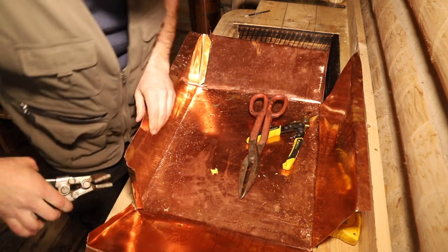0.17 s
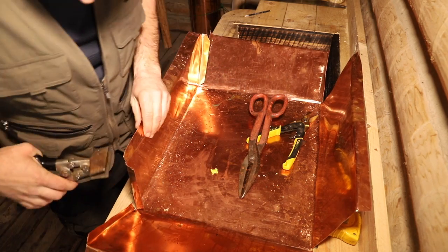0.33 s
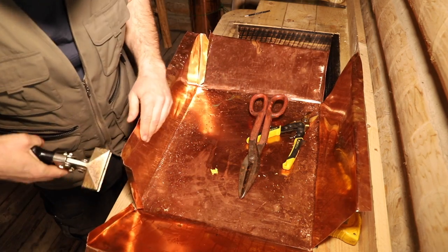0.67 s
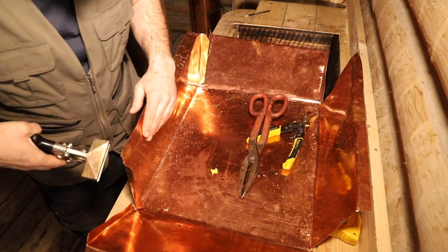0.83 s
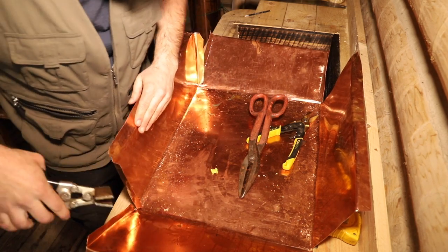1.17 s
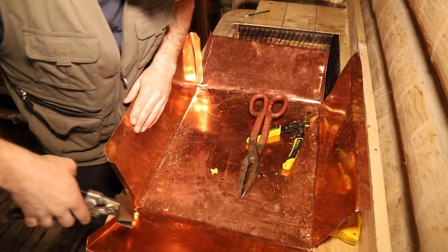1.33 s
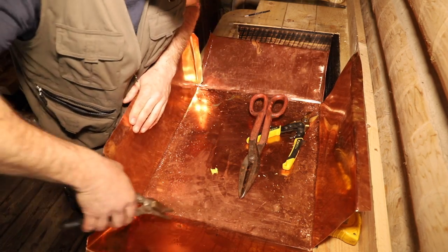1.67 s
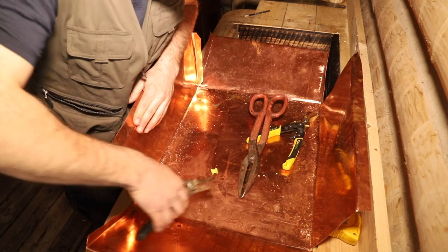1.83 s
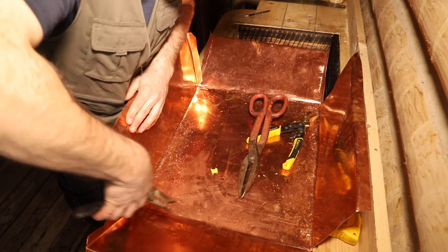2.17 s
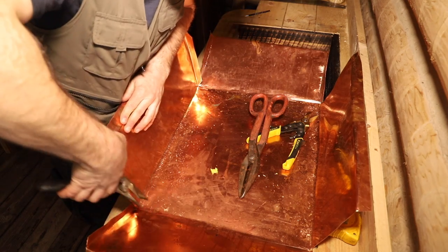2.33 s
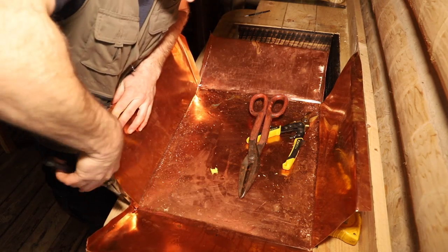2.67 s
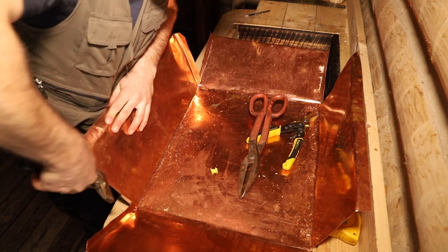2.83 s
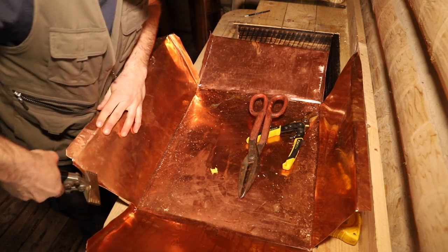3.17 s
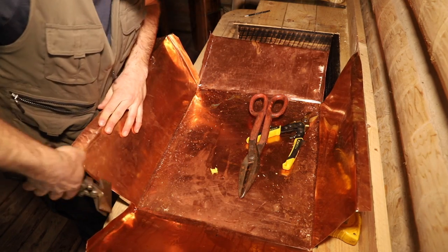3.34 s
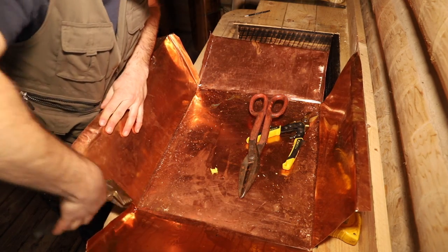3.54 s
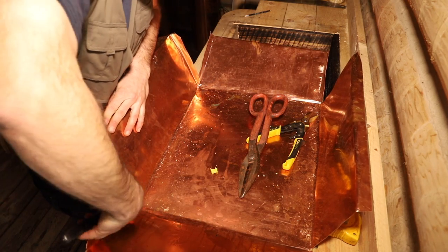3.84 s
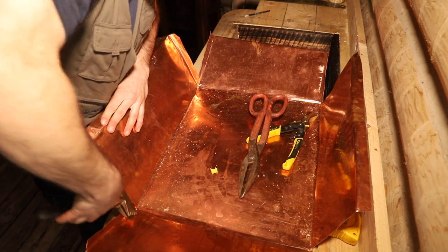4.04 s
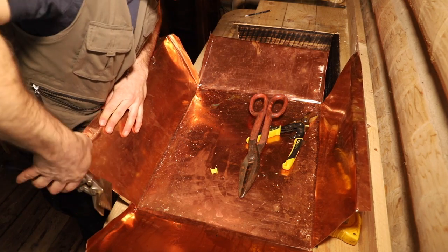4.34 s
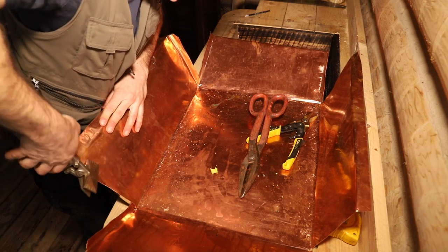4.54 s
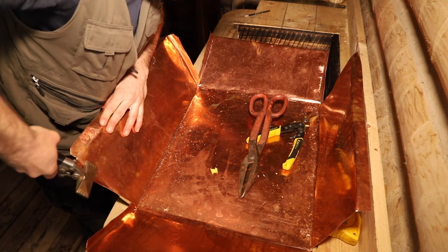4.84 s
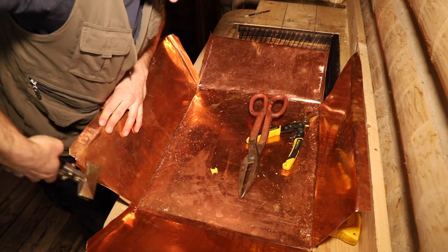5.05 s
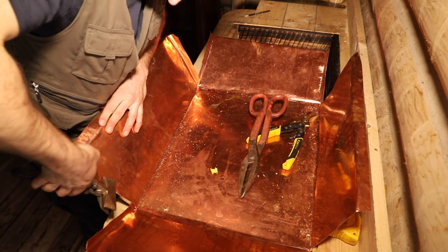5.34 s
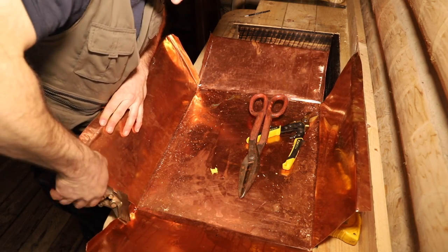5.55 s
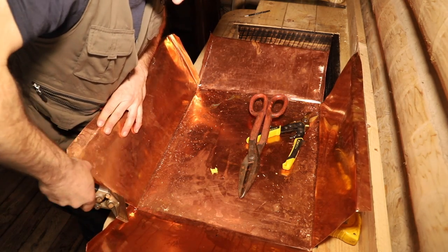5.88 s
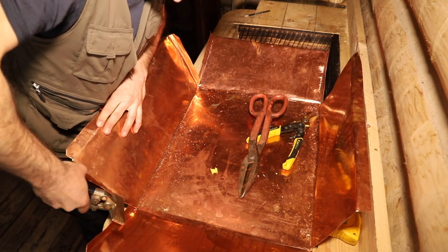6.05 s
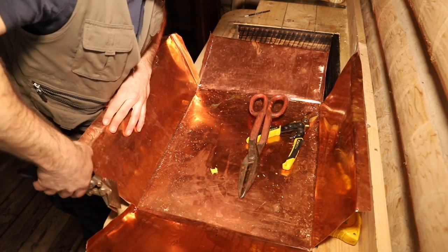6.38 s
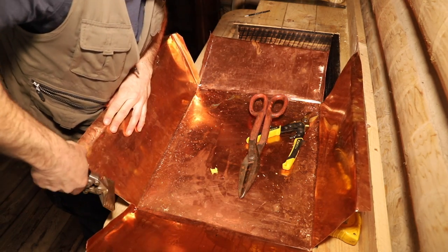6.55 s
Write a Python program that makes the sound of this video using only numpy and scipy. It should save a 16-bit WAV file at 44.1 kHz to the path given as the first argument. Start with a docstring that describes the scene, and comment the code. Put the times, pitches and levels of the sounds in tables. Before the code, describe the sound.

A close microphone in a quiet wooden workshop, with low rumble and slight hiss. From 0 to 2.4 s a thin copper sheet barely stirs: a faint scrape at the start, a soft counter thump at 0.55, a small cluster of knocks at 1.2, light creaks and tiny clinks. At 2.5 it scrapes and snaps, then at 2.8 to 2.95 knocks hard on the wood, the loudest moment, with a booming, wavering ring and a low groan near 3.1. From 3.35 scraping returns; between 3.6 and 4.7 come crowded buckling snaps, creaks, short gliding groans and bright steel clinks, strongest around 3.9, 4.3 and 4.6. It quiets by 4.8 with small clicks. A gritty scrape and snaps come at 5.1 to 5.25, a ringing snap at 5.65, then a lull. From 6.2 creaks, snaps and a clink at 6.44 continue to the end.

```python
"""Over a quiet room tone a thin copper sheet sways, creaks and scrapes as it is folded by hand with pliers.
Soon the steel pliers clink, and the sheet knocks on a wooden counter, snaps as it buckles and groans.
Sliding, sticking and blows are all clicks sent through the same modes (natural tones) of the sheet.
The pliers and the counter ring in tones of their own, and the groans are gliding tones.
A close microphone with a limiter turns the sound down after the loudest blows."""
import sys
import numpy as np
from scipy import signal
from scipy.fft import rfft, irfft
from scipy.io import wavfile
from scipy.ndimage import uniform_filter1d, minimum_filter1d, map_coordinates

SR = 44100
rng = np.random.default_rng(int(sys.argv[2]) if len(sys.argv) > 2 else 0)


def put_to_file(sound):
    """Save the sound as 16-bit audio at rate SR, in the file named by the first command-line argument."""
    columns = np.atleast_2d(sound).T  # one column per channel
    safe = np.clip(columns, -1, 1)
    whole_steps = np.round(safe * 32767)
    wavfile.write(sys.argv[1], SR, whole_steps.astype(np.int16))


N = 295911
T = np.arange(SR) / SR  # one second of ring
HZ = np.fft.rfftfreq(SR, 1 / SR)  # a grid of 1 Hz steps


def gain_of(db):
    """Turns decibels into amplitude."""
    return 10 ** (np.asarray(db) / 20)


def read(points, hz):
    """Joins (Hz, value) points by straight lines on a logarithmic frequency axis."""
    f, value = np.transpose(points)
    return np.interp(np.log(hz + 1), np.log(f + 1), value)


def add(mix, s, sound):
    """Adds a sound to the mix at s seconds."""
    part = mix[max(round(s * SR), 0):][:len(sound)]
    part += sound[:len(part)]


def dying(t60):
    """An exponential decay of unit energy that falls by 60 dB in t60 seconds."""
    fall = np.exp(-np.log(1000) * T / max(t60, 1 / SR))
    return fall / np.linalg.norm(fall)


def coloured_noise(colour):
    """Steady noise whose strength at each frequency follows a colour table."""
    spectrum = rfft(rng.standard_normal(N))
    return irfft(spectrum * gain_of(read(colour, np.fft.rfftfreq(N, 1 / SR))), N)


def plate_modes():
    """A plate has evenly dense modes: many weak ones and a few strong ones on the 1 Hz grid."""
    # The strongest modes of the folded sheet. Each row: frequency in Hz, level in dB over the weak ones.
    strong_modes = [(66, 14), (103, 4), (111, -16), (138, -5), (216, 8.5), (225, 4), (307, 9.5), (320, 9),
                    (393, 7), (479, 5), (527, 8.5), (570, 8.5), (689, 9.5), (791, 9.5), (915, 6),
                    (1060, 10.5), (1104, -0.5), (1345, 0.5), (1534, 10.5), (1663, 10.5), (1900, 3),
                    (2131, 8), (2406, 9.5), (2508, 4.5), (2713, 11.5), (2896, 8.5), (3192, 9), (3570, -14)]
    spacing = 14  # Hz
    heights = np.zeros(len(HZ))
    slots = np.arange(2 * spacing, len(HZ) - spacing, spacing)
    heights[slots + rng.integers(0, spacing, len(slots))] = 1
    for hz, db in strong_modes:
        heights[round(hz)] = gain_of(db)
    return heights / irfft(heights).std()


def nodes(depth_db):
    """Each spot on the sheet favours its own groups of modes: a ripple in dB that keeps the average power."""
    grid = np.arange(0, SR / 2, 130)
    ripple = depth_db * np.interp(HZ, grid, rng.uniform(-0.92, 1, len(grid)))
    return ripple - 10 * np.log10(np.mean(gain_of(ripple) ** 2))


def causal(colour_db):
    """Makes a colour into a minimum-phase filter, so that nothing sounds before the touch."""
    fold = 2. * (T < .5)
    fold[0] = 1
    cepstrum = irfft(np.log(gain_of(colour_db)))
    return np.exp(rfft(cepstrum * fold))


def response(modes, colour_db, crack_t60, ring_db, ring_time_factor=1, spread_s=0.001993):
    """The sheet's answer to a click at one spot: a dense crack, then the modes, the high ones mostly dying first."""
    # How long the sheet rings when free. Each row: frequency in Hz, time to fall by 60 dB in s.
    ring_times = [(60, 1.4), (250, 1.03), (700, 0.44), (1500, 0.5), (3000, 0.36), (6000, 0.22),
                  (12000, 0.12)]
    crack = rng.standard_normal(SR) * dying(crack_t60)
    spot = modes * np.exp(2j * np.pi * rng.random(len(HZ)))
    centres, t60s = np.transpose(ring_times)
    ring = np.zeros(SR)
    for peak, t60 in zip(np.eye(len(centres)), t60s):
        band = np.interp(np.log(HZ + 1), np.log(centres), peak)
        ring += irfft(spot * band) * dying(t60 * ring_time_factor)
    delay = spread_s / np.sqrt(1 + HZ / 1000)  # bending waves: the bass arrives late
    travel = np.exp(-2j * np.pi * np.cumsum(delay))
    answer = irfft(rfft(crack + gain_of(ring_db) * ring) * causal(colour_db) * travel)
    fade_out = np.clip(10 * (1 - T) - 1, 0, 1)
    return answer * fade_out * np.minimum(T / .0004, 1)  # the start takes 0.4 ms


def friction(modes, force, colour, slips_per_s, uneven_db, crack_t60, ring_db, ring_time_factor,
             nodes_db, spots_per_s, count=7):
    """Stick and slip: tiny uneven clicks follow the hands' force, at a contact that wanders over the sheet."""
    t = np.arange(N) / SR
    stops = np.arange(N // 512) / spots_per_s  # when the contact reaches a new spot
    visits = np.cumsum(rng.integers(1, count, len(stops))) % count
    out = np.zeros(N)
    for spot in range(count):
        share = np.sqrt(np.interp(t, stops, 1. * (visits == spot)))
        sizes = gain_of(uneven_db * np.minimum(rng.exponential(1, N), 4)) * rng.choice([-1, 1], N)
        slips = sizes * (rng.random(N) < slips_per_s / SR)
        colour_db = read(colour, HZ) + nodes(nodes_db)
        answer = response(modes, colour_db, crack_t60, ring_db, ring_time_factor)
        out += signal.oaconvolve(force * share * slips / slips.std(), answer)[:N]
    return out


def blows(modes, rows, colour, bass_hz, treble_hz):
    """Single blows on the sheet; the hardness of each contact sets its bass and treble."""
    out = np.zeros(N)
    bass = 1 / (1 + (HZ / bass_hz) ** 4)
    treble = 1 - 1 / (1 + (HZ / treble_hz) ** 4)
    for s, db, bass_db, treble_db, t60, ring_db in rows:
        hardness_db = bass_db * bass + treble_db * treble
        colour_db = read(colour, HZ) + hardness_db + nodes(depth_db=3.0)
        answer = response(modes, colour_db, t60, ring_db)
        add(out, s, gain_of(db) * np.sqrt(SR / 60) * answer)  # levels are rms over 1/60 s
    return out


def struck(table, tilt_db=0, detune=0.0087):
    """A solid body rings in its damped modes, at slightly different pitches at each blow."""
    hz, db, t60 = np.transpose(table)[:, :, None]
    height = np.log(hz / hz[0]) / np.log(hz[-1] / hz[0])  # 0 at the lowest mode, 1 at the highest
    waves = np.sin(2 * np.pi * hz * (1 + detune * rng.standard_normal(hz.shape)) * T)
    return (gain_of(db + tilt_db * height) * waves * np.exp(-np.log(1000) * T / t60)).sum(0)


def push(s, rise_s, hold_s, fade_db_per_s):
    """One effort of the hands: it builds smoothly, holds, and dies away."""
    t = np.arange(N) / SR - s
    attack = np.sin(np.pi / 2 * np.clip(t / max(rise_s, 1 / SR), 0, 1)) ** 2
    return attack * gain_of(-fade_db_per_s * np.maximum(t - rise_s - hold_s, 0))


def room_tone():
    """Low rumble and hiss are coloured noise; a faint steady whine is a sine wave."""
    # Colour of the room and the microphone hiss. Each row: frequency in Hz, gain in dB.
    room_colour = [(20, -26), (45, -34), (65, -56), (110, -28.5), (350, -36.5), (600, -35.5), (1500, -43),
                   (2800, -43), (5000, -52.5), (9000, -57), (16000, -60)]
    whine_hz, whine_db = 10649, -78
    whine = np.sqrt(2) * np.sin(2 * np.pi * whine_hz * np.arange(N) / SR)
    return coloured_noise(room_colour) + gain_of(whine_db) * whine


def flexing():
    """Forces on the whole sheet and on the fold; overlapping flexes add in power."""
    # The hands flex the sheet. Each row: start in seconds, rise in s, hold in s,
    # sway of the whole sheet in dB, creak of the fold in dB, settling in dB per s.
    flexes = [(0.0, 0.0034, 0.014, -30, -42, 71), (0.294, 0.066, 0.089, -47, -48, 100),
              (0.66, 0.034, 0.069, -42, -52, 96), (1.237, 0.016, 0.0086, -29.5, -35, 103),
              (1.488, 0.0081, .02, -35.5, -40, 83), (1.559, 0.013, 0.0093, -32, -57, 130),
              (1.665, 0.015, 0.0091, -34.5, -49.5, 92), (1.755, .01, 0.08, -38, -44.5, 84),
              (2.145, 0.063, 0.11, -33, -38, 80), (2.338, 0.0087, 0.031, -24.5, -51, 150),
              (2.468, 0.025, 0.082, -16, -21, 220), (2.62, 0.034, 0.026, -23.5, -33, 90),
              (2.832, 0.0094, .03, -6.5, -4.5, 150), (2.92, 0.027, 0.034, -6, -3.5, 95),
              (2.98, 0.071, 0.1, -9, -21.5, 220), (3.164, 0.0055, 0.027, -12, -32, 90),
              (3.363, 0.053, 0.11, -24.5, -23, 90), (3.61, 0.057, 0.026, -23, -21, 150),
              (3.726, .01, 0.048, -18.5, -22.5, 63), (3.913, 0.018, 0.091, -24, -17.5, 83),
              (4.12, 0.037, 0.15, -25.5, -16, 85), (4.404, 0.012, 0.11, -16.5, -16.5, 121),
              (4.582, 0.052, 0.015, -16.5, -15, 81), (4.958, .02, 0.051, -31.5, -41, 80),
              (5.076, 0.0091, .05, -37, -30, 80), (5.168, .11, 0.07, -22, -23, 190),
              (5.464, 0.027, 0.26, -38, -24.5, 92), (5.69, .06, .03, -26, -40, 77),
              (6.21, .01, 0.057, -16.5, -19, 90), (6.325, 0.021, 0.036, -19, -21, 90),
              (6.446, 0.045, 0.025, -19, -15, 113), (6.583, 0.011, 0.013, -15.5, -17, 121)]
    rest_db = -59.5  # the steadying hand never lies quite still
    sway, creak = np.full((2, N), gain_of(rest_db) ** 2)
    for s, rise_s, hold_s, sway_db, creak_db, settling in flexes:
        effort = push(s, rise_s, hold_s, settling)
        sway += (gain_of(sway_db) * effort) ** 2
        creak += (gain_of(creak_db) * effort) ** 2
    return np.sqrt(sway), np.sqrt(creak)


def swaying(modes, force):
    """The whole sheet sways: dense, nearly even slips with a low colour."""
    # Colour of the sway. Each row: frequency in Hz, gain in dB.
    sway_colour = [(25, -42), (65, -6), (105, 12), (165, 7.5), (220, 15.5), (330, 10.5), (450, 9.5),
                   (900, -10), (3000, -41.5)]
    return friction(modes, force, sway_colour, slips_per_s=1500, uneven_db=1, crack_t60=0.077,
                    ring_db=-1.5, ring_time_factor=0.44, nodes_db=3.0, spots_per_s=9)


def creaking(modes, force):
    """The fold creaks: slips with short cracks, strongest in the middle range."""
    # Colour of the creak. Each row: frequency in Hz, gain in dB.
    creak_colour = [(100, 2), (250, 6), (420, 9.5), (750, 15.5), (1300, 5.5), (2600, -14.5), (5000, -24),
                    (12000, -95)]
    return friction(modes, force, creak_colour, slips_per_s=1200, uneven_db=-0.5, crack_t60=0.027,
                    ring_db=-2.5, ring_time_factor=0.49, nodes_db=6, spots_per_s=9)


def sliding():
    """Forces of the sliding jaws and of the grit caught under them; overlaps add in power."""
    # The jaws scrape along the sheet. Each row: start in seconds, rise in s, hold in s,
    # scrape in dB, fine grit in dB.
    strokes = [(-0.003, 0.082, 0.024, -34.5, -45), (0.26, 0.036, 0.15, -51, -55),
               (0.69, 0.033, 0.016, -50.5, -57), (1.0, .05, 0.0083, -67, -55), (1.26, .015, .02, -39, -59),
               (1.469, .02, 0.049, -39, -55), (1.734, 0.012, 0.092, -41.5, -56.5),
               (2.142, 0.048, 0.087, -34, -49), (2.322, .01, 0.041, -31.5, -50),
               (2.491, 0.017, 0.039, -20.5, -35), (2.625, .03, 0.018, -40, -48),
               (2.922, .01, 0.026, -17, -32), (3.348, 0.042, .13, -20.5, -36.5),
               (3.599, 0.02, 0.033, -22, -42), (3.721, .015, .01, -28.5, -41.5),
               (3.805, 0.078, .04, -29.5, -41.5), (4.1, 0.033, 0.059, -16, -35),
               (4.271, 0.0089, 0.018, -12.5, -23), (4.393, 0.0092, .01, -17.5, -44),
               (4.444, 0.028, 0.065, -19.5, -39), (4.539, 0.031, 0.044, -14, -28.5),
               (4.827, .01, 0.0097, -30, -59), (4.961, 0.019, 0.014, -38.5, -60),
               (5.078, .01, .05, -38, -52), (5.137, 0.079, 0.031, -16, -27.5),
               (5.464, .01, 0.05, -27.5, -44.5), (5.537, 0.019, 0.11, -23.5, -39.5),
               (6.215, 0.016, 0.04, -24.5, -43), (6.317, 0.012, 0.071, -24.5, -37.5),
               (6.425, .02, 0.057, -17, -30.5), (6.58, .01, 0.017, -27, -40.5)]
    rest_db = -61  # the steadying hand never lies quite still
    scrape_fade, grit_fade = 149, 277  # dB per s: as the jaws slow down, the grit stops first
    scrape, grit = np.full(N, gain_of(rest_db) ** 2), np.zeros(N)
    for s, rise_s, hold_s, scrape_db, grit_db in strokes:
        scrape += (gain_of(scrape_db) * push(s, rise_s, hold_s, scrape_fade)) ** 2
        grit += (gain_of(grit_db) * push(s, rise_s, hold_s, grit_fade)) ** 2
    return np.sqrt(scrape), np.sqrt(grit)


def scraping(modes, force):
    """The jaws scrape: sparser, more uneven slips at a contact that moves quickly."""
    # Colour of the scrape. Each row: frequency in Hz, gain in dB.
    scrape_colour = [(200, -2), (600, 1), (1000, 6.5), (1500, 6), (2000, 6), (2800, 5.5), (3500, -7),
                     (5000, -10.5), (8000, -36.5), (16000, -35)]
    return friction(modes, force, scrape_colour, slips_per_s=700, uneven_db=3.5, crack_t60=0.038,
                    ring_db=-0.5, ring_time_factor=0.38, nodes_db=6, spots_per_s=20)


def gritting(modes, force):
    """Fine grit under the jaws: bright, uneven slips at a contact that moves fastest."""
    # Colour of the grit. Each row: frequency in Hz, gain in dB.
    grit_colour = [(500, -9), (2000, 0.5), (3500, 13), (5000, 5.5), (7500, -2), (10000, -7.5), (13000, -13),
                   (16000, -25.5)]
    return friction(modes, force, grit_colour, slips_per_s=900, uneven_db=3.5, crack_t60=0.053,
                    ring_db=-4.0, ring_time_factor=0.45, nodes_db=9.5, spots_per_s=28)


def pliers(chatter=0.46, chatter_t60=.03, tick_db=10, tick_t60=.02):
    """A dry tick and a short ring of steel; the loose joint chatters for a moment after each touch."""
    # The steel pliers clink. Each row: start in seconds, level in dB, brightness in dB.
    clinks = [(0.338, -46, 11), (1.116, -53, 4), (2.002, -41, 9), (3.193, -39, 19), (3.634, -20, 2),
              (4.276, -13, -5), (4.409, -30, 17), (4.828, -31, -19), (4.918, -38, -24.5),
              (4.940, -32.5, -21), (6.436, -26, -2)]
    # Modes of the pliers. Each row: frequency in Hz, level in dB, time to fall by 60 dB in s.
    steel_modes = [(2410, -6, 0.034), (2555, 9.5, 0.027), (3100, -3, .035), (5500, -8.5, 0.026),
                   (7550, -21, 0.049), (9200, -14, 0.015), (10400, -16, 0.015)]
    out = np.zeros(N)
    tick_band = signal.butter(2, [1800, 8000], "bandpass", fs=SR)
    for s, db, bright_db in clinks:
        contact = chatter * rng.standard_normal(SR) * dying(chatter_t60)
        contact[0] = 1  # the touch itself
        tick = signal.lfilter(*tick_band, rng.standard_normal(SR) * dying(tick_t60))
        tick *= gain_of(tick_db + bright_db / 2)
        ring = signal.fftconvolve(contact, struck(steel_modes, bright_db))[:SR]
        add(out, s, gain_of(db) * (tick + ring))
    return out


def counter(sway_force, contact_s=0.0042):
    """Soft thumps on the wooden top; it shudders after each of them and under the swaying sheet."""
    # The counter takes the weight. Each row: start in seconds, level in dB.
    thumps = [(0.544, -7.5), (1.18, -13), (1.192, -3.5), (1.213, -16), (1.268, -22), (2.837, 3.5),
              (2.914, -4), (4.42, -9), (6.212, -22)]
    # Modes of the counter. Each row: frequency in Hz, level in dB, time to fall by 60 dB in s.
    wood_modes = [(64, -27, .3), (90, -20.5, 0.21), (136, -3, 0.056), (191.5, -0.5, 0.064)]
    # Colour of the shudder. Each row: frequency in Hz, gain in dB.
    shudder_colour = [(15, -21), (30, -17), (45, 2.5), (66, 5.5), (90, 5), (160, -12), (600, -70)]
    shudder_db, growth = -36.5, 0.25  # level at a sway force of 1, and dB per dB of sway
    jolt_db, jolt_fade = -23.5, 60  # the shudder a thump leaves: dB relative to it, dB per s
    out = np.zeros(N)
    shaking = (gain_of(shudder_db) * sway_force ** growth) ** 2
    soft_start = np.sin(np.pi / 2 * np.minimum(T / contact_s, 1)) ** 2
    for s, db in thumps:
        add(out, s, gain_of(db) * struck(wood_modes) * soft_start)
        add(shaking, s, gain_of(db + jolt_db - jolt_fade * T) ** 2)
    shudder = coloured_noise(shudder_colour)
    return out + shudder / shudder.std() * np.sqrt(shaking)


def knocking(modes):
    """The sheet knocks on the counter: blows with a low, thudding colour."""
    # Each row: start in seconds, level in dB, bass in dB, treble in dB,
    # time for the thud to fall by 60 dB in s, ring in dB.
    knocks = [(0.545, -26, 7.5, -15, 0.5, -2), (1.182, -29.5, -2.5, 6, 0.13, 6),
              (1.193, -18.5, 7, 4, 0.29, -7), (1.214, -19, -2, 12, 0.26, -18),
              (2.836, -10, -0.5, 3, 0.14, 9.5), (2.914, 6, -12, 8.5, 0.25, -2),
              (4.415, -24, -1, -6, 0.23, -6), (5.647, -20, -12, 5, 0.74, 8)]
    # Colour of the knocks. Each row: frequency in Hz, gain in dB.
    knock_colour = [(30, -26), (70, -5), (110, 17.5), (210, 20.5), (400, 16.5), (900, 7), (1600, -6),
                    (3000, -23.5), (8000, -48), (16000, -62)]
    return blows(modes, knocks, knock_colour, bass_hz=294, treble_hz=1400)


def snapping(modes):
    """The sheet buckles or the jaws catch its edge: blows with a brighter colour."""
    # Each row: start in seconds, level in dB, bass in dB, treble in dB,
    # time for the crack to fall by 60 dB in s, ring in dB.
    snaps = [(1.200, -28.5, -13, -4, 0.086, -0.5), (1.494, -30.5, 4, -5, 0.2, -6),
             (1.765, -34, 6, -5, 0.064, -13), (2.339, -30, 6, -7.5, 0.08, 5.5),
             (2.477, -15.5, 3.5, 9.5, 0.088, -1.5), (2.740, -29, 12, -0.5, 0.14, 5.5),
             (2.78, -8.5, 1.5, -5.5, 0.083, -1), (2.803, -21, 21, -23, 0.18, -14),
             (2.922, -10, -1, -22, 0.14, 2), (3.616, -21, 7, 3.5, 0.11, -6),
             (3.657, -17, 6, -15, 0.092, -22), (3.734, -25.5, 2, -11, 0.079, -13),
             (3.91, -6, 3.5, -9.5, 0.33, -7), (4.119, -20, 4, -12, 0.1, -6),
             (4.277, -7.5, -4.5, -6, 0.3, 2.5), (4.407, -8.5, 5, -28, 0.068, -12),
             (4.512, -12, -2, 4.5, 0.13, -11), (4.63, -2.5, -18, -17, 0.19, -10),
             (4.83, -34, 19, -20, 0.086, -3), (4.845, -28, -9, -1, 0.085, -21),
             (5.086, -35, 1, 1, 0.026, -3), (5.106, -29.5, 6.5, -11, 0.079, -3),
             (5.201, -20.5, 1, 7.5, 0.12, 5), (5.245, -13, -19, -4, 0.093, -5),
             (5.462, -33, 9, 7, 0.083, -2), (5.555, -24, -4, 2, .08, 2),
             (5.643, -12, -3.5, -3.5, 0.18, 12.5), (6.189, -37, 3, -5, 0.045, -4),
             (6.21, -13.5, 3, -8.5, 0.17, -4), (6.318, -12.5, -9, -23, 0.2, 3),
             (6.445, -26.5, 15, -10, 0.093, 1.5), (6.586, -17, 6, -2, 0.06, -12)]
    # Colour of the snaps. Each row: frequency in Hz, gain in dB.
    snap_colour = [(40, -18.5), (160, 9.5), (700, -1), (1600, 6), (2800, 5), (5000, -5.5), (8000, -17.5),
                   (13000, -28), (16000, -36)]
    return blows(modes, snaps, snap_colour, bass_hz=1080, treble_hz=3950)


def groaning(rough=0.34, width_hz=45):
    """The fold sticks and slips in step with one mode: uneven tones swell and fade while it gives."""
    # Each row: start in seconds, length in s, start pitch in Hz, end pitch in Hz, level in dB.
    groans = [(3.064, 0.11, 222, 221.4, -5.5), (3.648, 0.069, 1050, 1083, -19),
              (3.70, 0.077, 1140, 1120, -22.5), (3.744, 0.057, 705, 680, -20),
              (3.902, 0.045, 1360, 1440, -13), (3.92, 0.17, 800, 759, -21), (3.96, 0.052, 520, 485, -16.5),
              (4.084, 0.22, 695, 686, -16), (4.426, 0.37, 315, 305.2, -16.5), (5.55, 0.11, 830, 804, -23),
              (6.308, 0.12, 224, 225, -20)]
    out = np.zeros(N)
    smooth = signal.butter(2, width_hz / 2, fs=SR)
    for s, length, start_hz, end_hz, db in groans:
        n = int(length * SR)
        waver = signal.lfilter(*smooth, rng.standard_normal(SR) + 1j * rng.standard_normal(SR))
        tone = np.exp(2j * np.pi * np.cumsum(np.linspace(start_hz, end_hz, n)) / SR)
        tone *= 1 + rough * waver[-n:] / waver.std()
        add(out, s, gain_of(db) * tone.real * signal.windows.tukey(n, .5))
    return out


def bend(sound, glide=0.00706, count=12):
    """The changing curvature of the sheet makes its modes waver in pitch, by the fraction glide (rms)."""
    n = np.arange(N)
    slide = np.zeros(N)
    for rate in np.geomspace(1.5, 8, count):  # Hz
        slide += np.sin(2 * np.pi * (rate * n / SR + rng.random())) * SR / (2 * np.pi * rate)
    return map_coordinates(sound, [n + glide * slide * np.sqrt(2 / count)], order=3)


def scene():
    """The sheet, damped by the hand while it is worked, with the counter, the pliers and the room."""
    modes = plate_modes()
    sway_force, creak_force = flexing()
    scrape_force, grit_force = sliding()
    sheet = swaying(modes, sway_force) + creaking(modes, creak_force)
    sheet += scraping(modes, scrape_force) + gritting(modes, grit_force)
    sheet += knocking(modes) + snapping(modes) + groaning()
    return (room_tone() + bend(sheet) + pliers() + counter(sway_force))[None]


def record(dry, limit_db=-13.0, hold_s=0.038, recover_db_per_s=85, attack_s=0.013):
    """A limiter ducks quickly, holds and recovers; peaks over full scale clip; then the top treble is cut."""
    power = abs(uniform_filter1d(dry[0] ** 2, size=220))  # averaged over about 5 ms
    excess_db = np.maximum(10 * np.log10(power + 1e-12) - limit_db, 0)
    half = max(int(hold_s * SR / 2), 1)
    held_db = -minimum_filter1d(-excess_db, 2 * half + 1, origin=half)  # the highest of the last moments
    fall = np.arange(N) * recover_db_per_s / SR
    duck_db = np.maximum.accumulate(held_db + fall) - fall
    r = np.exp(-1 / (attack_s * SR))
    smooth_duck_db = signal.lfilter([1 - r], [1, -r], duck_db)
    limited = np.clip(dry * gain_of(-smooth_duck_db), -1, 1)
    low_pass = signal.firwin(511, 16200, window=("kaiser", 9), fs=SR)  # edge in Hz
    return signal.oaconvolve(limited, low_pass[None], "same")


dry = scene()
out = record(dry)
put_to_file(out)
```